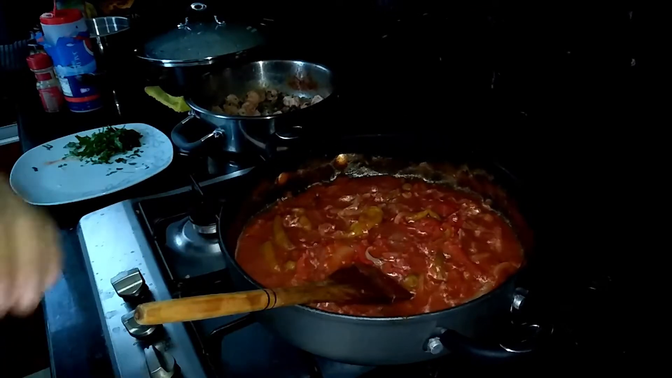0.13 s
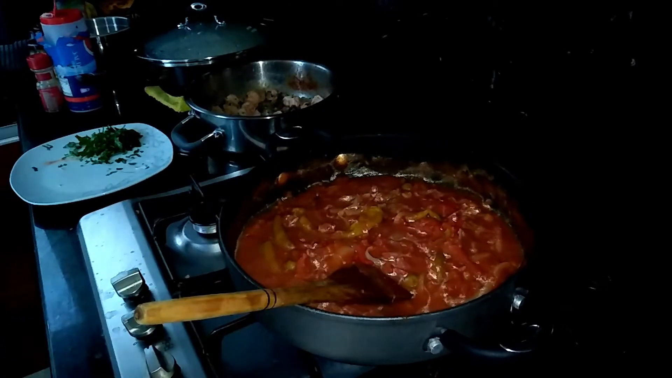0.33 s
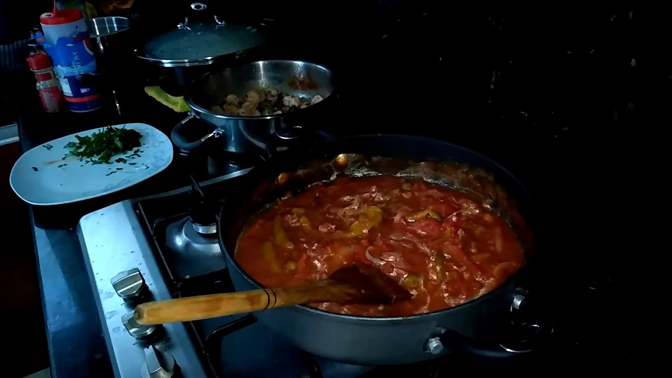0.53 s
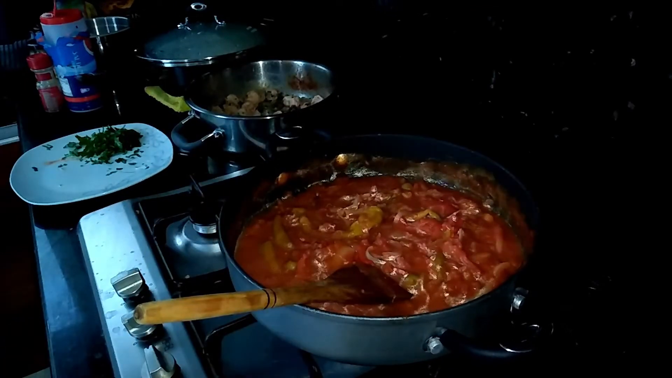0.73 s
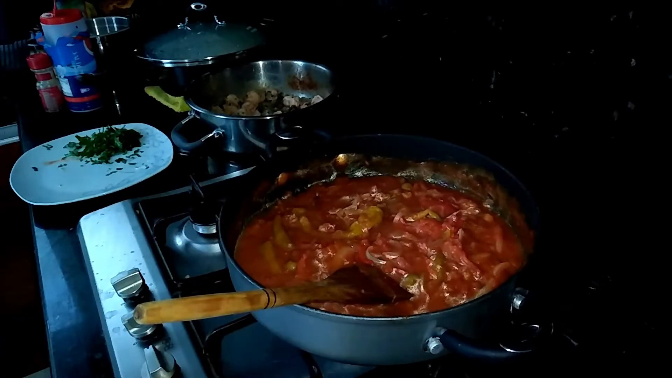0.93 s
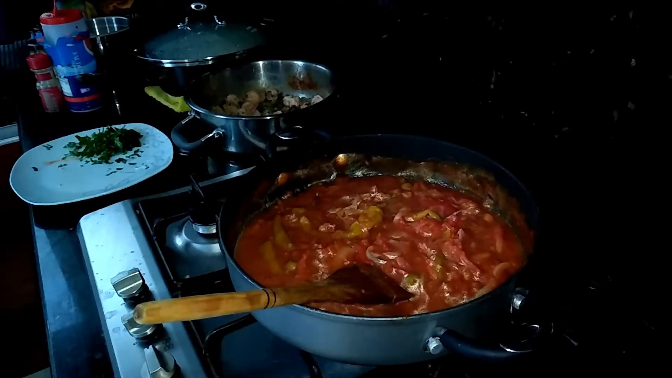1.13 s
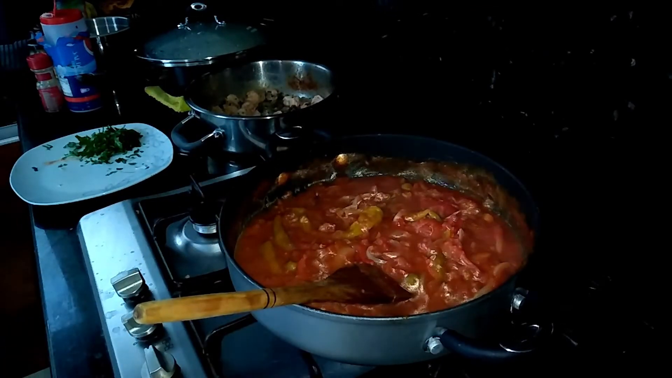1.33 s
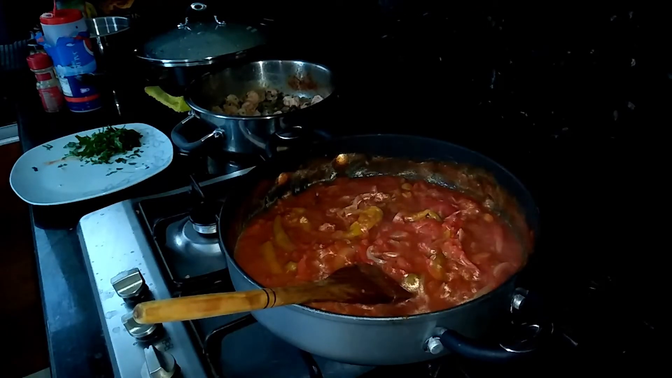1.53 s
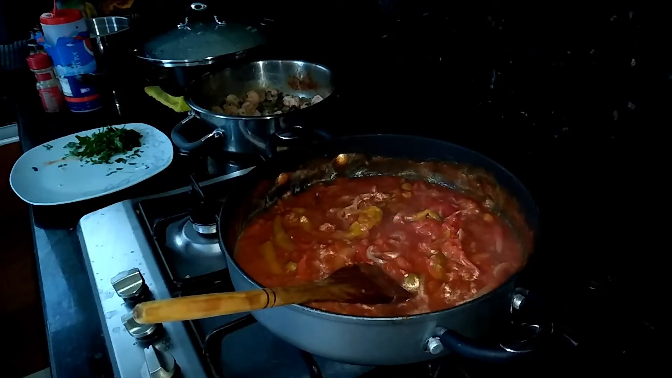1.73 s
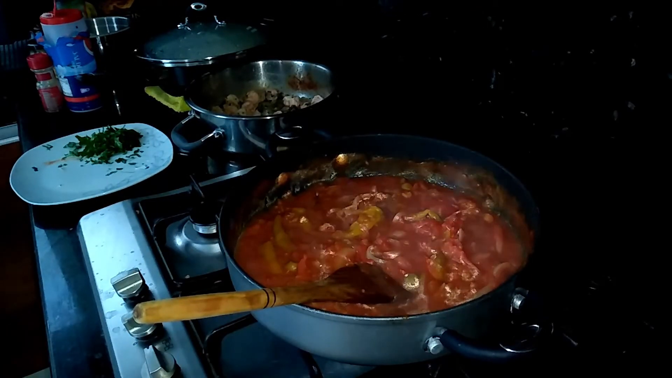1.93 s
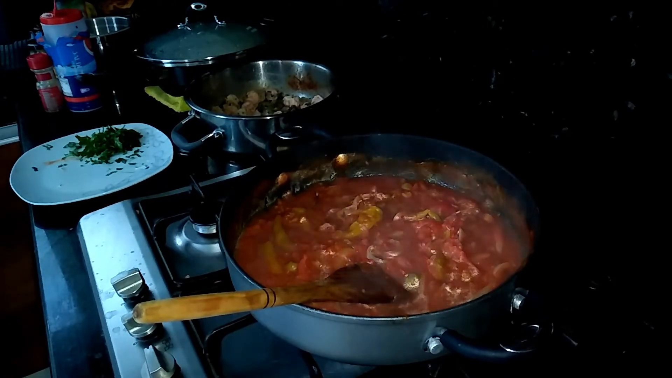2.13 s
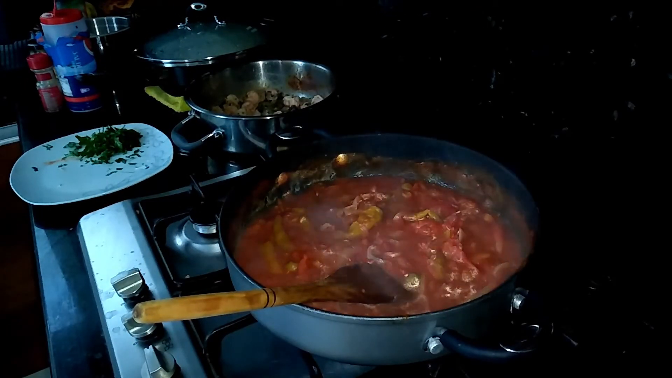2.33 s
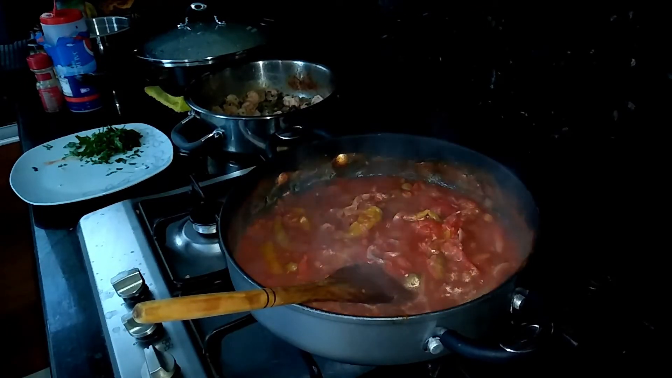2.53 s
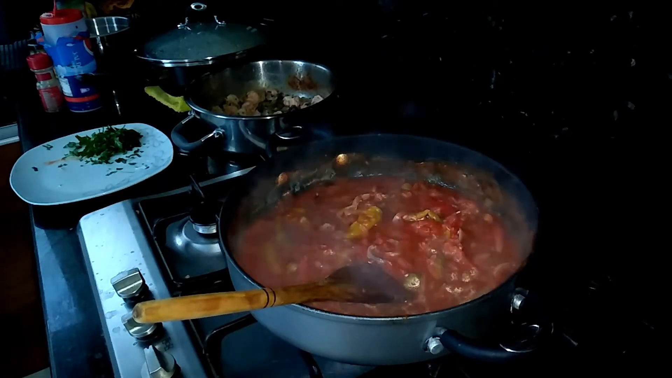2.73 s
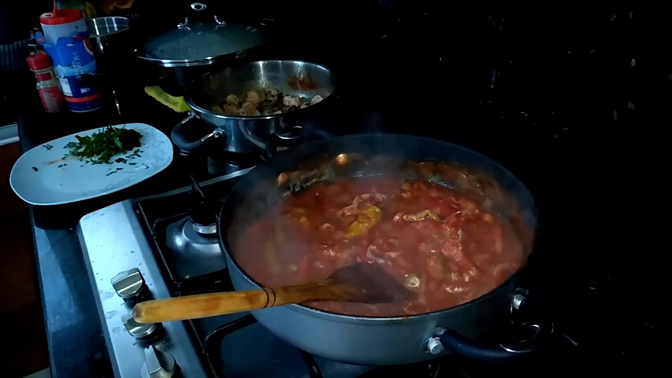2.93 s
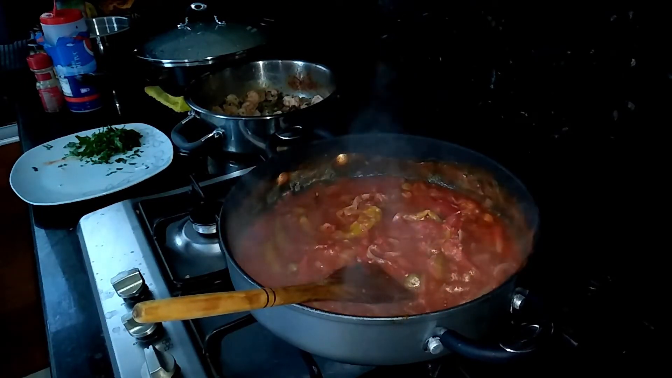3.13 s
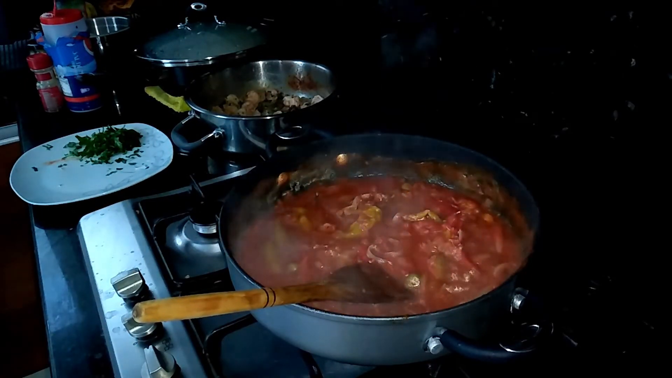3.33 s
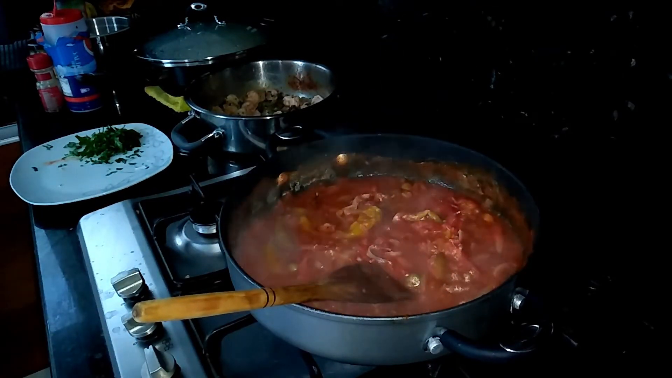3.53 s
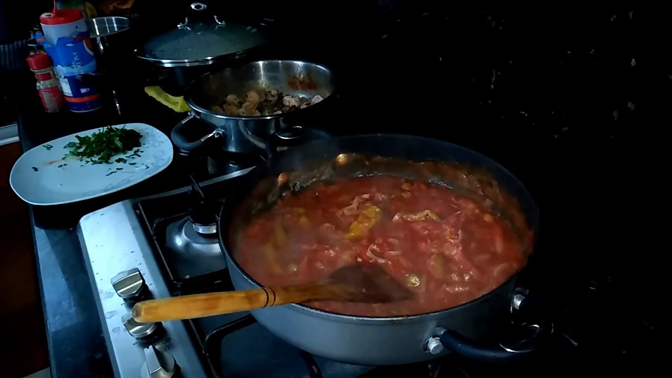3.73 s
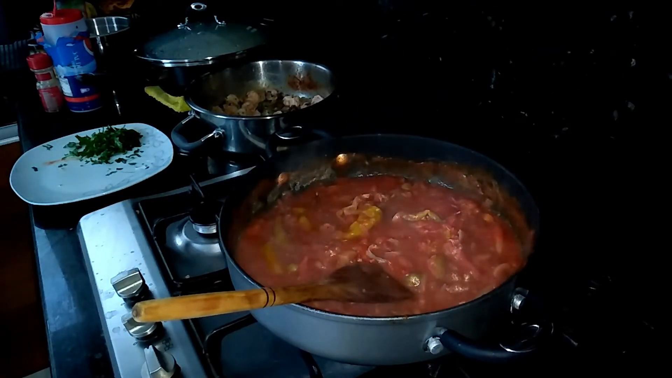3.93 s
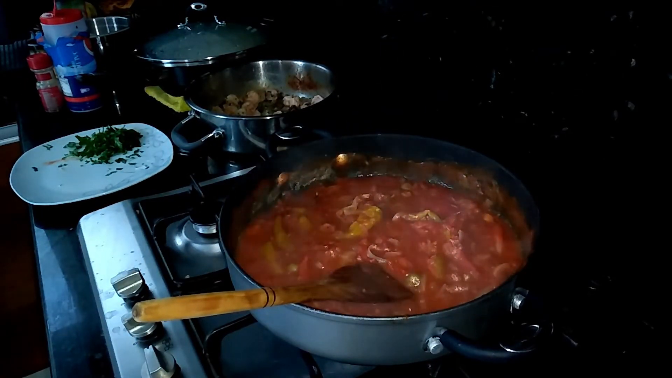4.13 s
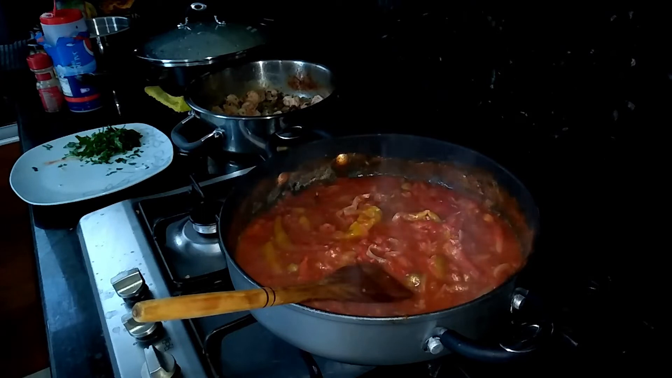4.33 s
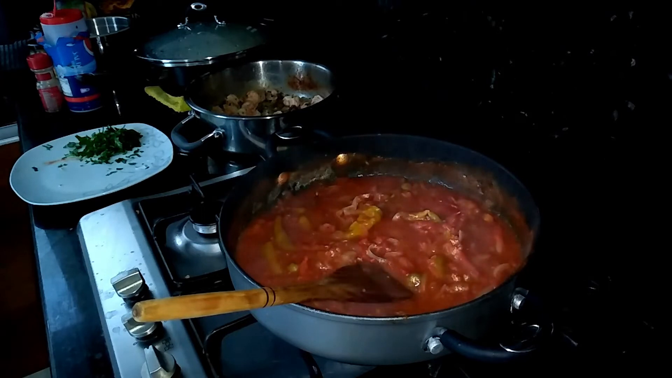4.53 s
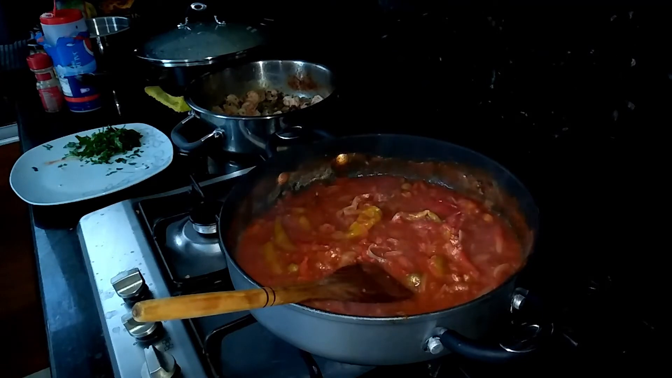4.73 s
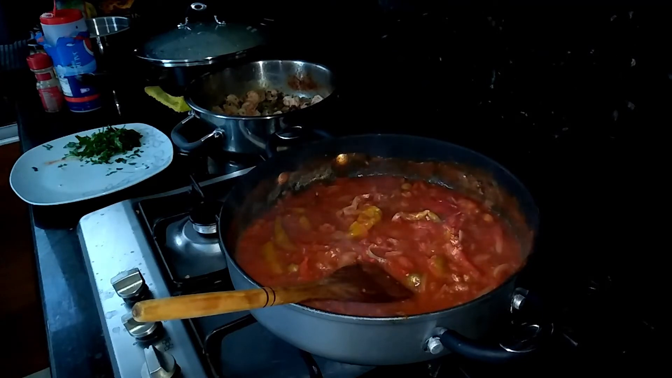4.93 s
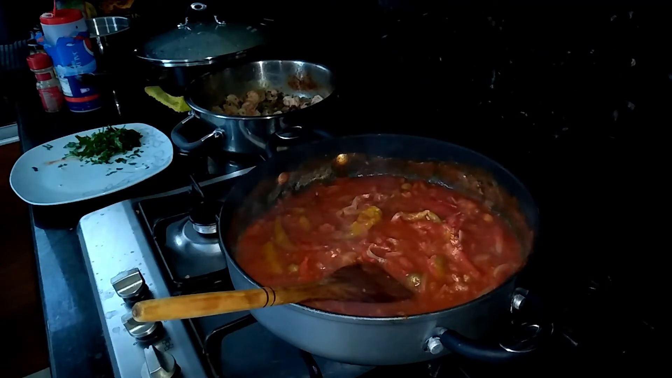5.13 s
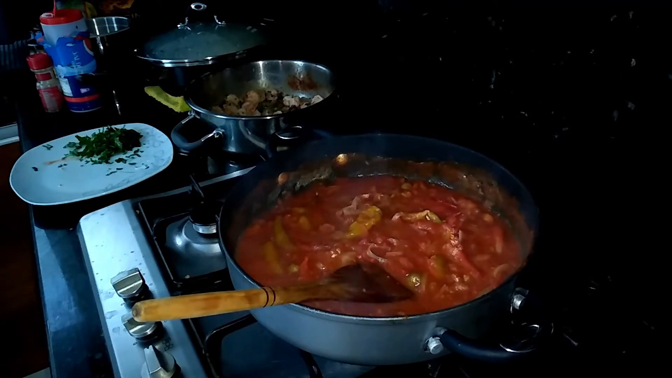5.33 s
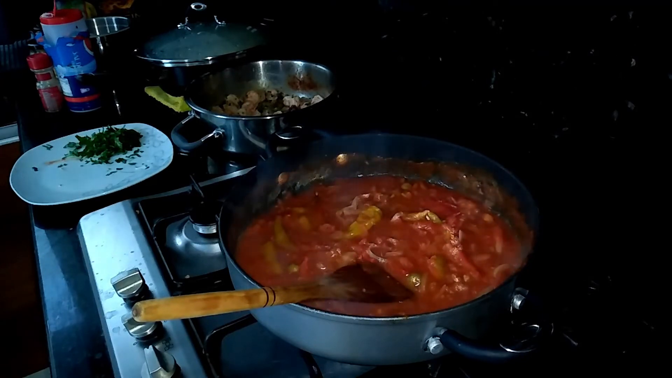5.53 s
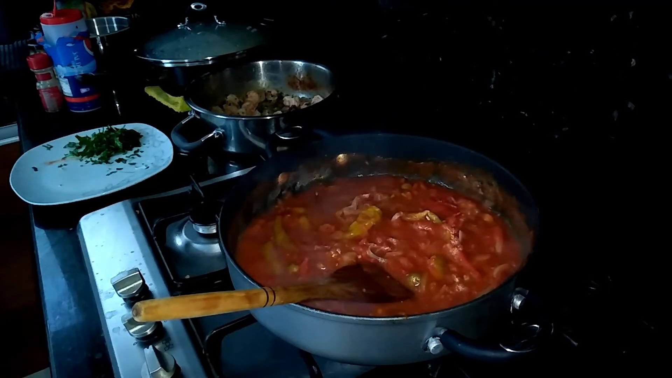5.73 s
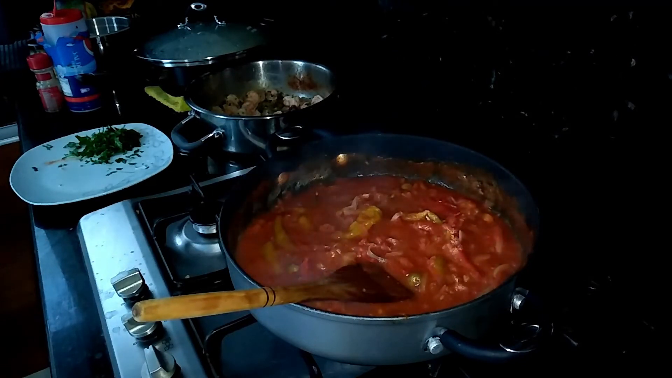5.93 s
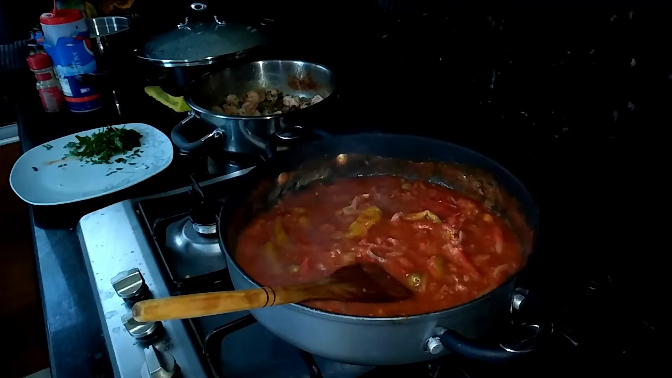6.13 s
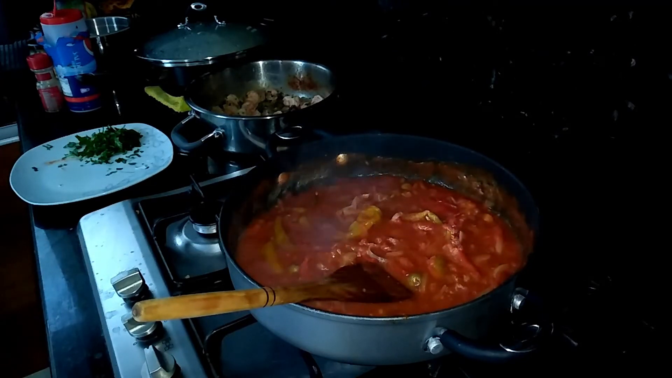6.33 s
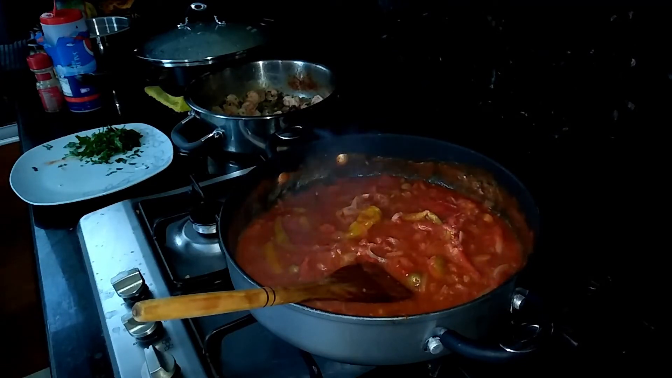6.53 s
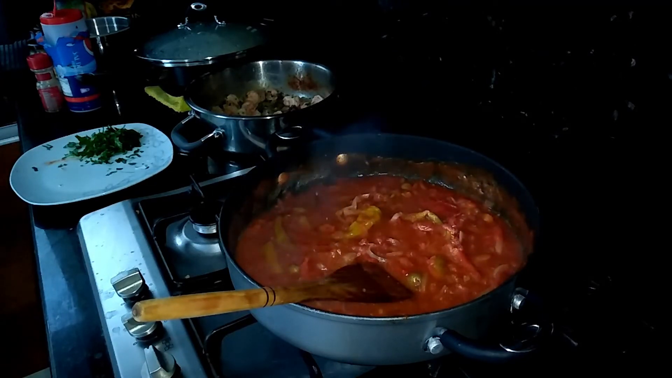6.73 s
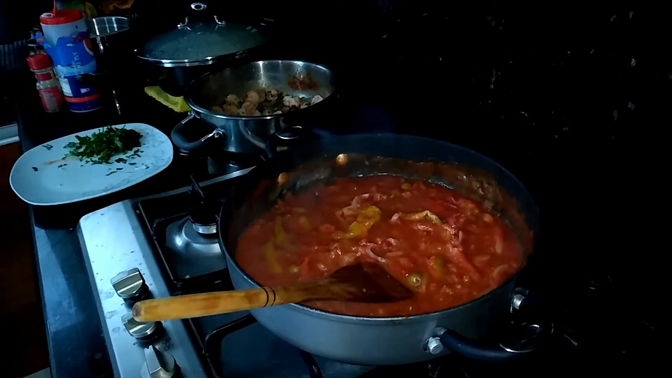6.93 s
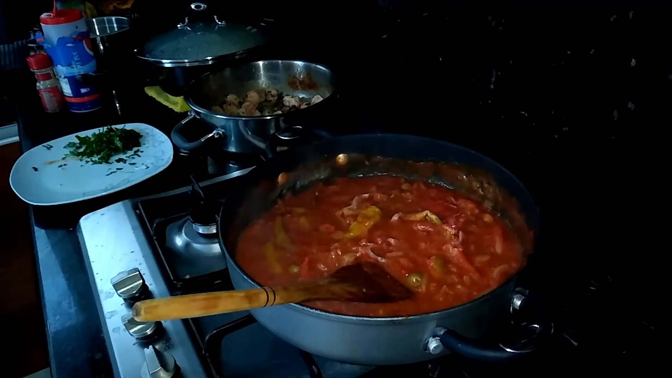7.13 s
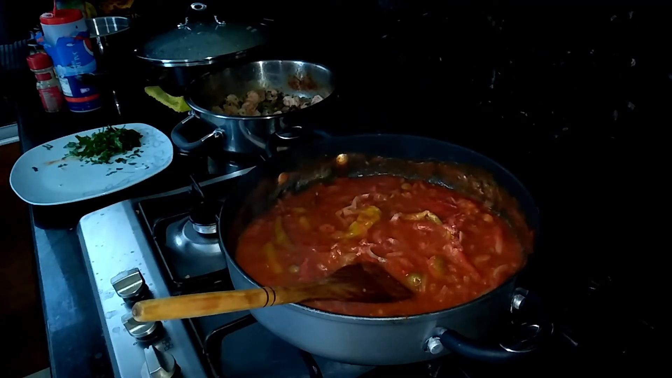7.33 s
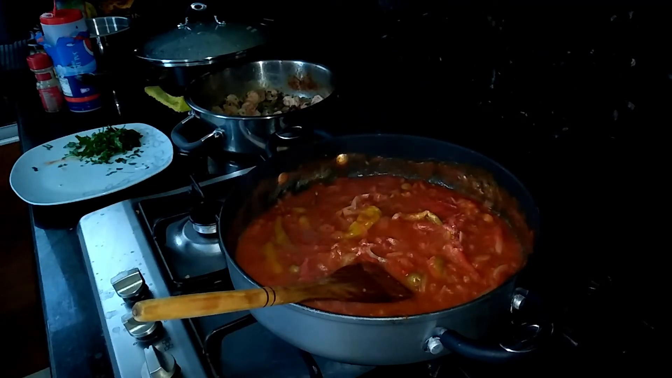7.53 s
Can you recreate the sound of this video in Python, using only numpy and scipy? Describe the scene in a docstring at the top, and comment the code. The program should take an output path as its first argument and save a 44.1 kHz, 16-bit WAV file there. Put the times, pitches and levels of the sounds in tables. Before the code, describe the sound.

Thin plastic crinkles and snaps close by while thick sauce plops softly in a pan, with a few light knocks in a small kitchen.

```python
"""A thin, stiff film, perhaps a plastic packet, crackles to the right: creases snap with each squeeze,
over a rustle that grows louder; one thin, rising squeak sounds as the film is handled.
A wide pan of thick sauce simmers in the same small kitchen; steam pockets plop at its surface.
A few things knock on the worktop and set it ringing. An appliance hums over a faint room hiss."""
import sys
import numpy as np
from scipy import signal
from scipy.fft import rfft, irfft
from scipy.io import wavfile

SR = 44100
rng = np.random.default_rng(int(sys.argv[2]) if len(sys.argv) > 2 else 0)


def unload_audio(sound):
    """Save the sound as a 16-bit wav file, at the path given as the first command line argument."""
    columns = np.transpose(np.atleast_2d(sound))
    # keep every value between -1 and 1, then stretch to whole-number steps
    steps = np.round(np.clip(columns, -1, 1) * 32767)
    wavfile.write(sys.argv[1], SR, steps.astype(np.int16))


N = 335160
TIME_S = np.arange(N) / SR
BINS_HZ = np.maximum(np.arange(N // 2 + 1) * SR / N, 1)


def from_db(db):
    """Level to gain."""
    return 10 ** (np.asarray(db) / 20)


def rms_one(x):
    """Scale to rms 1."""
    return x / np.sqrt(np.mean(x ** 2) + 1e-20)


def in_time(rows):
    """Interpolate a table's columns at every sample."""
    times_s, *columns = np.transpose(rows)
    return [np.interp(TIME_S, times_s, column) for column in columns]


def at_hz(rows, hz):
    """Read a table on a log-frequency axis."""
    rows_hz, values = np.transpose(rows)
    return np.interp(np.log(hz), np.log(rows_hz), values)


def add(track, start_s, sound):
    """Mix a short sound in."""
    at = round(start_s * SR)
    track[..., at:at + sound.shape[-1]] += sound[..., :N - at]


def band(x, low_hz, high_hz, order=2):
    """Butterworth band-pass."""
    return signal.sosfilt(signal.butter(order, [low_hz, high_hz], "band", fs=SR, output="sos"), x)


def coloured(x, gain_db):
    """Apply a gain per FFT bin."""
    return irfft(rfft(x) * from_db(gain_db), N)


def drift(corner_hz):
    """Slow noise, rms 1."""
    hop = 40
    pole = np.exp(-2 * np.pi * corner_hz * hop / SR)
    slow = signal.lfilter([1], [1, -2 * pole, pole * pole], rng.standard_normal(N // hop + 2002))[2000:]
    return np.interp(np.arange(N) / hop, np.arange(len(slow)), rms_one(slow))


def ring(clicks, hz, t60_s):
    """Resonator: a unit click starts a decaying unit sine."""
    r = from_db(-60 / (t60_s * SR))
    w = 2 * np.pi * min(hz, SR / 2.2) / SR
    return signal.lfilter([0, np.sin(w)], [1, -2 * r * np.cos(w), r * r], clicks + 1e-18)


def diffuse(spectrum_db):
    """Diffuse stereo noise, alike on both sides in the bass."""
    # f/Hz, left-right correlation
    likeness = [(100, .93), (280, .8), (600, .4), (1300, 0), (15000, 0)]
    alike = at_hz(likeness, BINS_HZ)
    mid, side = rng.standard_normal((2, N))
    mid = coloured(mid, spectrum_db + 10 * np.log10(1 + alike))
    side = coloured(side, spectrum_db + 10 * np.log10(1 - alike))
    return rms_one(np.stack([mid + side, mid - side]))


def kitchen(x, wet_db, t60_s=0.3, onset_s=0.0011, wall_cut_hz=22000):
    """Diffuse wall echoes of a mono source."""
    t = np.arange(SR // 2) / SR
    tail = diffuse(0)[:, :len(t)] * from_db(-60 * t / t60_s) * np.minimum(t / onset_s, 1)
    tail = signal.lfilter(*signal.butter(1, wall_cut_hz, fs=SR), tail)
    tail = rms_one(tail) / np.sqrt(len(t))
    return from_db(wet_db) * signal.fftconvolve(x[None], tail, axes=1)[:, :N]


def room_tone(hiss_db=-66.5, waver_db=2.4):
    """Steady hiss and an appliance's wavering mains hum."""
    # hiss spectrum: f/Hz, relative density/dB
    hiss_spectrum = [(25, -33), (55, 0), (95, -14.5), (270, 0), (575, -10), (962, -4), (1160, -4),
                     (1260, -16), (1650, -24), (10100, -40), (11000, -21.5), (13600, -32.5), (16000, -4.5)]
    # mains hum: f/Hz, rms level/dB
    hum_tones = [(119.6, -79)]
    hum = sum(np.sqrt(2) * from_db(db + waver_db * drift(16.0)) * np.sin(2 * np.pi * hz * TIME_S)
              for hz, db in hum_tones)
    return from_db(hiss_db) * diffuse(at_hz(hiss_spectrum, BINS_HZ)) + hum


def creases(spectrum, per_s, uneven_db, t60_cycles, clump_db, flicker_db=2.5, pitch_count=11):
    """Creases snap in random clumps; each swells and rings a few cycles. Stereo, rms 1."""
    clumps = from_db(clump_db * drift(19.0))
    sizes = from_db(uneven_db * np.minimum(rng.exponential(1, N), 4.0)) * rng.choice([-1, 1], N)
    clicks = sizes * clumps * (rng.random(N) < per_s * clumps / SR)
    spots = rng.integers(0, 3, N)   # each spot has its own delay to the left port
    left = sum(np.roll(clicks * (spots == k), 2 + 9 * k) for k in range(3))
    clicks = np.stack([left, clicks])
    pitch_index = rng.integers(0, pitch_count, N // 32 + 1).repeat(32)[:N]
    out = np.zeros((2, N))
    for k, hz in enumerate(np.geomspace(spectrum[1][0], spectrum[-2][0], pitch_count)):
        drive = clicks * (pitch_index == k) * from_db(flicker_db * drift(11.0))
        rung = ring(ring(drive, hz, t60_cycles / hz), hz, 17.4 / hz)
        out += rung * hz ** 2 * from_db(at_hz(spectrum, hz))   # hz ** 2 offsets the resonators' gain
    return rms_one(out)


def ticks(per_s=110.0, uneven_db=3.5):
    """Lone broadband ticks with a brief high ring. Stereo, rms 1."""
    fires = rng.random(N) < per_s / SR
    clicks = fires * from_db(uneven_db * np.minimum(rng.exponential(1, N), 3.0)) * rng.choice([-1, 1], N)
    sound = band(clicks + 1e-18, 1700, 15000, order=1)
    sound += 0.25 * ring(clicks, 7870, t60_s=0.0037) + 0.029 * ring(clicks, 3500, t60_s=0.012)
    return rms_one(np.stack([np.roll(sound, 2), sound]))


def squeeze_envelope(starts_s, holds_s, levels_db, floor_db, fall_db_per_s, attack_s=0.0047):
    """Power sum of a floor and all squeezes: quick swell, hold, steady fall."""
    power = from_db(2 * floor_db)
    for start_s, hold_s, db in zip(starts_s, holds_s, levels_db):
        swell = np.clip((TIME_S - start_s) / attack_s, 0, 1)
        released_s = np.maximum(TIME_S - start_s - attack_s - hold_s, 0)
        power += (swell * from_db(db - fall_db_per_s * released_s)) ** 2
    return np.sqrt(power)


def snaps(strain_s=0.005, tick_s=0.0007, splinter_s=0.012):
    """The film strains, then gives a tearing tick and splinters, rung at the crease's pitch."""
    # loud single snaps: t/s, level/dB, ring f/Hz
    events = [(0.1994, -33, 9700), (0.4218, -41.5, 8700), (0.4788, -42.5, 8640), (0.536, -45, 3120),
              (0.5597, -41.5, 3950), (0.754, -39, 10700), (0.9455, -40, 5560), (1.019, -29, 9400),
              (1.142, -33, 7900), (1.2, -40, 5100), (1.217, -37.5, 3040), (1.228, -34, 10100),
              (1.2529, -24.5, 3500), (1.267, -25, 9650), (1.285, -21, 11300), (1.387, -36, 11100),
              (1.549, -26, 11000), (1.5823, -21.5, 10200), (1.679, -28.5, 9300), (1.8184, -36, 8050),
              (1.8513, -28, 8150), (1.855, -37.5, 2100), (1.895, -39, 2260), (1.989, -34, 10600),
              (2.043, -23, 9100), (2.2533, -29.5, 9500), (2.3078, -25.5, 9300), (2.4005, -16.5, 13000),
              (2.5529, -30.5, 9600), (2.6818, -34.5, 2160), (2.7915, -23.5, 9050), (2.8374, -27, 9400),
              (3.105, -25, 9300), (3.1793, -23.5, 11300), (3.267, -34.5, 6740), (3.421, -29.5, 7100),
              (3.523, -20.5, 10440), (3.769, -38.5, 2920), (3.8097, -31, 1820), (3.978, -31, 9900),
              (4.179, -29, 10900), (4.3251, -29.5, 8800), (4.533, -20.5, 9650), (4.7015, -31, 8300),
              (4.8225, -25.5, 11500), (4.916, -20.5, 10000), (4.9208, -15.5, 10700), (4.9395, -30, 9900),
              (4.951, -18, 10300), (5.014, -20.5, 9700), (5.391, -36, 2100), (5.5565, -26.5, 9600),
              (5.815, -27, 9500), (5.8639, -26, 10600), (5.9713, -33, 1780), (6.0882, -24, 10000),
              (6.0985, -20, 10100), (6.4316, -28.5, 9500), (6.5183, -19.5, 10800), (6.8713, -23.5, 10700),
              (7.1203, -25.5, 10100), (7.2669, -23, 9400), (7.3787, -22.5, 10200), (7.409, -20, 10500),
              (7.5018, -23, 9450), (7.555, -17, 10650)]
    out = np.zeros((2, N))
    lead_s = 2 * strain_s
    t = np.arange(SR // 20) / SR - lead_s
    tick = np.exp(-np.maximum(t, -6 * t) / tick_s)
    strain_and_decay = np.exp(np.minimum(t / strain_s, -t / splinter_s))
    for at_s, db, hz in events:
        splinters = 0.11 * from_db(2.5 * rng.standard_normal(len(t) // 30 + 1).repeat(30)[:len(t)])
        tear = rng.standard_normal((2, len(t))) * (tick + splinters * strain_and_decay)
        snap = ring(tear, hz, t60_s=15.0 / hz) + 0.11 * tear
        snap = band(snap, 0.33 * hz, 22000)   # a small crease has little below its pitch
        add(out, at_s - lead_s, from_db(db) * snap / np.max(np.abs(snap[1])))
    return out


def packet():
    """A hand squeezes the film: fine and coarse creases, loud snaps on top."""
    # fine crease spectrum: f/Hz, relative level/dB
    fine_spectrum = [(2650, -39), (4500, 3), (5810, 10), (6350, 2), (7570, 6.5), (9920, 10), (11300, 5),
                     (12300, 6), (16000, -28)]
    # coarse crease spectrum: f/Hz, relative level/dB
    coarse_spectrum = [(820, -38), (1400, -1.5), (1700, 11), (2450, 0.5), (3010, 8.5), (3500, -0.5),
                       (5000, -0.5), (6500, -20)]
    # squeezes: t/s, hold/s, fine level/dB, coarse level/dB
    squeezes = [(0.164, 0.071, -51.5, -52.5), (0.459, 0.013, -54, -62.5), (0.64, 0.014, -62, -61.5),
                (0.979, 0.029, -46, -66), (1.125, 0.0087, -58.5, -74), (1.252, 0.0099, -37.5, -56),
                (1.54, 0.082, -49, -58), (1.669, 0.0076, -43.5, -56.5), (1.814, 0.071, -56.5, -66),
                (2.019, 0.11, -47, -59.5), (2.163, 0.32, -54, -67), (2.389, 0.041, -43.5, -56),
                (2.536, 0.11, -54, -58), (2.706, 0.24, -52.5, -61), (3.086, 0.086, -53, -56.5),
                (3.322, 0.11, -67, -56), (3.519, 0.02, -48.5, -47.5), (3.804, 0.099, -50, -51),
                (3.968, 0.037, -48, -55), (4.157, 0.21, -49, -56.5), (4.423, 0.12, -46.5, -61),
                (4.519, 0.034, -43, -56), (4.592, 0.068, -49, -61.5), (4.724, 0.16, -47.5, -54.5),
                (4.902, 0.084, -68, -54), (5.285, 0.32, -49.5, -54), (5.805, 0.028, -50.5, -62),
                (5.992, 0.0092, -50, -62), (6.084, 0.03, -49.5, -54), (6.433, 0.031, -42.5, -63),
                (6.511, 0.039, -45, -57), (6.872, 0.03, -52, -73), (7.254, 0.022, -44, -55),
                (7.373, 0.043, -49, -66)]
    # rustle between squeezes: t/s, fine level/dB
    rustle = [(0, -76), (.3, -77), (.55, -67), (1.0, -78.5), (1.95, -67), (2.2, -75.5), (3.3, -54),
              (4.1, -55), (4.7, -107), (5.05, -45.5), (5.27, -54), (5.68, -48.5), (6.3, -48), (7.3, -46),
              (7.6, -45.5)]
    starts_s, holds_s, fine_db, coarse_db = np.transpose(squeezes)
    rustle_db, = in_time(rustle)
    fine = creases(fine_spectrum, per_s=9000.0, uneven_db=1.6, t60_cycles=4, clump_db=2.5)
    fine += from_db(-10.5) * ticks()
    fine *= squeeze_envelope(starts_s, holds_s, fine_db, rustle_db, fall_db_per_s=396)
    coarse = creases(coarse_spectrum, per_s=5000.0, uneven_db=1.3, t60_cycles=14, clump_db=1.58)
    coarse *= squeeze_envelope(starts_s, holds_s, coarse_db, rustle_db - 7.5, fall_db_per_s=226)
    film = band(fine + coarse + snaps(), 1597, 20000, order=6)   # thin film radiates no bass
    film = band(film, 500, 12800)
    return film + kitchen(film[1], wet_db=-6.5) * from_db([[3.0], [0]])


def knocks():
    """Rough contacts, duller when soft, ring the worktop and fill the room."""
    # contacts: t/s, level/dB, low f/Hz, high f/Hz, contact time/s
    contacts = [(0.118, -25, 830, 4100, 0.0027), (0.117, -37.5, 148, 636, 0.02),
                (2.274, -60, 162, 245, 0.0038), (3.811, -44, 980, 2140, 0.012),
                (3.812, -48.5, 252, 520, 0.0099), (4.749, -66, 216, 324, 0.004),
                (5.283, -55.5, 159, 247, 0.0036), (5.298, -44.5, 228, 520, 0.017)]
    # worktop modes: f/Hz, t60/s, gain/dB
    modes = [(159, 0.077, -43.5), (201, 0.15, -46.5), (273, 0.055, -38), (407, 0.043, -45.5),
             (1030, 0.06, -45)]
    blows, t = np.zeros(N), np.arange(SR // 4) / SR
    for start_s, db, low_hz, high_hz, contact_s in contacts:
        rub = rng.standard_normal(len(t)) * t / contact_s * np.exp(1 - t / contact_s)
        rub = band(rub, low_hz, high_hz, order=3)
        add(blows, start_s, from_db(db) * rub / np.max(np.abs(rub)))
    worktop = sum(ring(blows, hz, t60_s) * from_db(db) for hz, t60_s, db in modes)
    sound = band(worktop + 1.52 * blows, 130, 21000, order=3)   # small things radiate no deep bass
    dulled = signal.lfilter(*signal.butter(1, 1800, fs=SR), sound)   # cupboards swallow the treble
    return sound + kitchen(dulled, wet_db=6.5)


def sauce_plops(small_count=400, small_from_s=1.5, attack_s=0.0055, t60_s=0.033, blur_step_rad=0.045):
    """A steam pocket bursts its skin; the cavity rings, rising in pitch as it opens."""
    # main plops: t/s, level/dB, f/Hz
    main_plops = [(0.659, -48.5, 1363), (0.981, -55.5, 1210), (1.257, -51.5, 760), (1.298, -55.5, 1190),
                  (1.588, -48, 504), (2.412, -39.5, 1455), (2.678, -47.5, 934), (2.745, -42.5, 987),
                  (2.989, -42.5, 804), (3.013, -43, 603), (3.108, -44, 1456), (3.281, -48, 1454),
                  (3.5225, -39, 680), (4.7, -44.5, 1250), (4.911, -40.5, 997), (5.53, -45, 823),
                  (5.549, -41.5, 1390), (5.84, -48, 1000), (5.972, -43.5, 760), (6.589, -45, 1060),
                  (6.711, -45, 800), (7.267, -43, 1500), (7.406, -46, 747), (7.549, -51, 620)]
    small_s = rng.uniform(small_from_s, N / SR, small_count)
    small_db = -62.5 + 5 * np.clip(rng.standard_normal(small_count), -2, 2)
    small_hz = np.exp(rng.uniform(np.log(520), np.log(1500), small_count))
    out, t = np.zeros(N), np.arange(SR // 10) / SR
    envelope = np.minimum(t / attack_s, 1) * from_db(-60 * t / t60_s)
    for start_s, db, hz in [*main_plops, *zip(small_s, small_db, small_hz)]:
        skin = 0.6 * band(rng.standard_normal(len(t)), 0.6 * hz, 2.5 * hz) * np.exp(-t / 0.004)
        skin[:2] += 1.1, -1.1   # dry click
        blur_rad = blur_step_rad * np.cumsum(rng.standard_normal(len(t)))   # thick sauce blurs the pitch
        cavity = envelope * np.sin(2 * np.pi * hz * (t + 0.42 * t * t) + blur_rad)
        add(out, start_s, from_db(db) * (skin + cavity))
    return out


def squeak(wobble=0.019, flutter_db=4.5, fade_db_per_s=600):
    """A thin, unsteady, rising squeak, heard once while the film is handled."""
    # squeak contour: t/s, f/Hz, level/dB
    contour = [(2.42, 2165, -75), (2.56, 2566, -65), (2.72, 2745, -66.5), (2.87, 2770, -66.5),
               (3.06, 2820, -92)]
    hz, db = in_time(contour)
    outside_s = np.maximum(contour[0][0] - TIME_S, 0) + np.maximum(TIME_S - contour[-1][0], 0)
    db += flutter_db * drift(48) - fade_db_per_s * outside_s
    hz *= 1 + wobble * drift(66.8)
    return from_db(db) * np.sin(2 * np.pi * np.cumsum(hz) / SR)


def scene():
    """All sources at the microphone ports."""
    crackle = packet()
    plops_and_squeak = sauce_plops() + squeak()
    return crackle + plops_and_squeak + kitchen(plops_and_squeak, wet_db=3.5) + knocks() + room_tone()


def record(dry, cutoff_hz=16500):
    """The left port is shaded in the treble, the open right port resonates; the top is cut."""
    # port balance: f/Hz, left over right/dB
    balance = [(100, -3.5), (400, -2), (900, 0.5), (2000, -6), (4000, -7.5), (6000, -7.5), (9000, -16),
               (15000, -17.5)]
    tilt_db = at_hz(balance, BINS_HZ)
    right_db = -20 * np.log10(np.sqrt(1 + from_db(2 * tilt_db)) / 2)   # keeps the summed power flat
    resonance_db = 4.1 * np.exp(-((BINS_HZ - 10100) / 740.0) ** 2)
    ports = np.stack([coloured(dry[0], right_db + tilt_db), coloured(dry[1], right_db + resonance_db)])
    return signal.sosfilt(signal.cheby2(12, 70, cutoff_hz, fs=SR, output="sos"), ports)


dry = scene()
out = record(dry)
unload_audio(out)
```